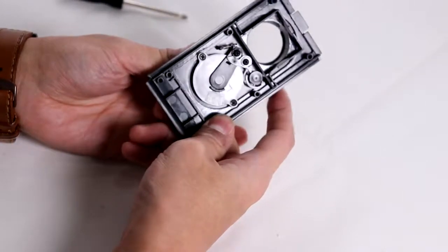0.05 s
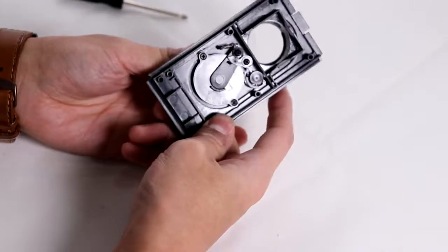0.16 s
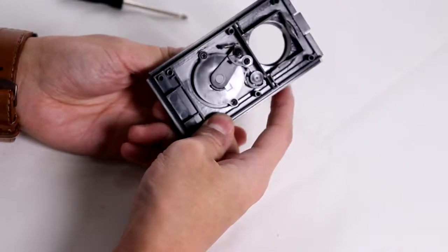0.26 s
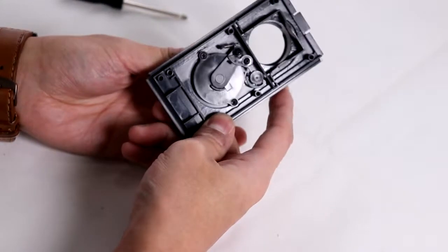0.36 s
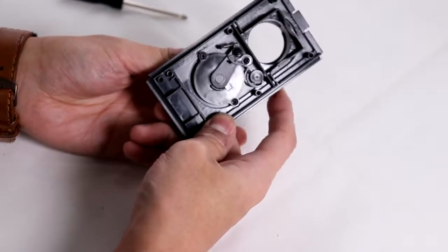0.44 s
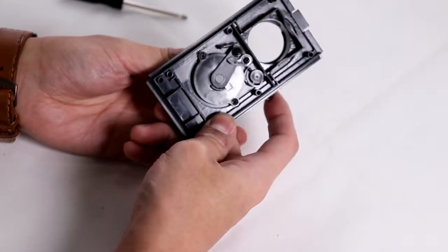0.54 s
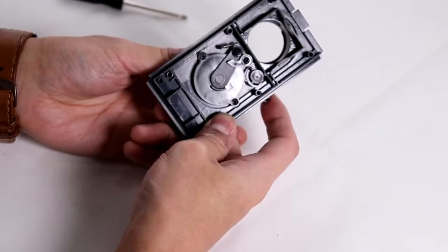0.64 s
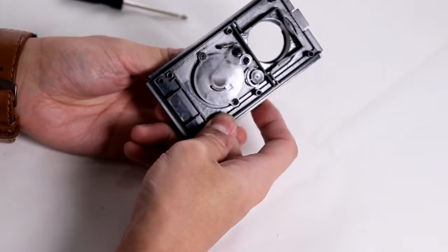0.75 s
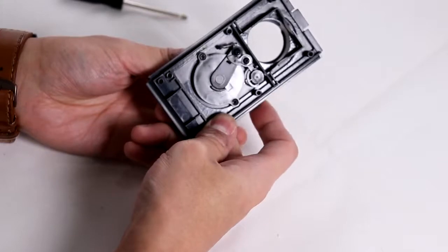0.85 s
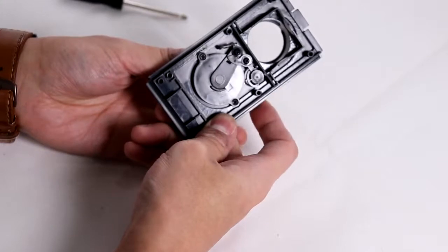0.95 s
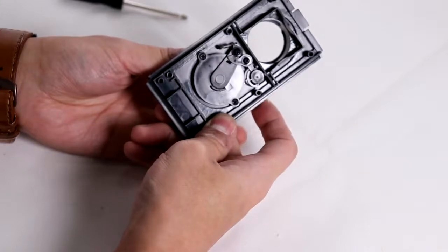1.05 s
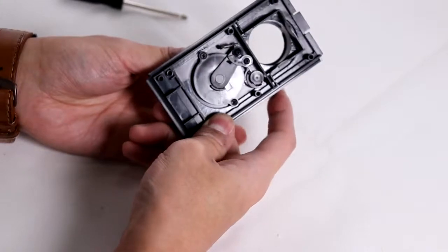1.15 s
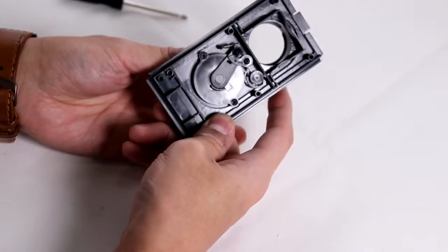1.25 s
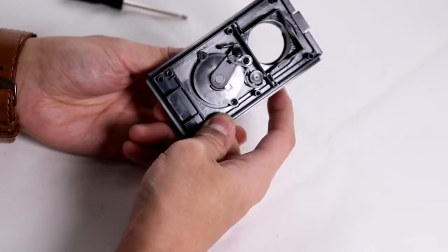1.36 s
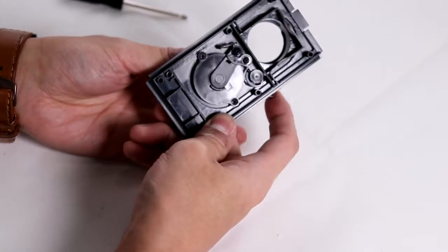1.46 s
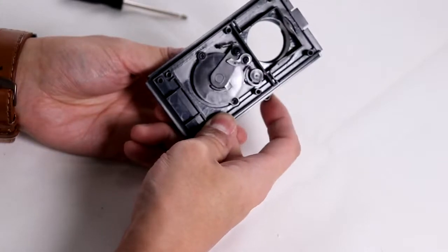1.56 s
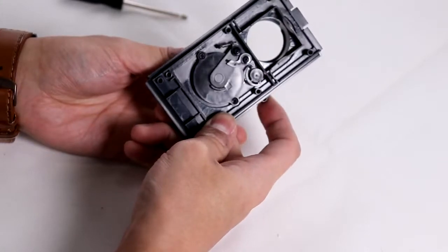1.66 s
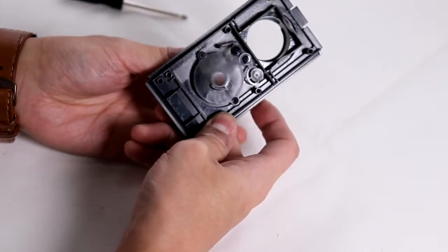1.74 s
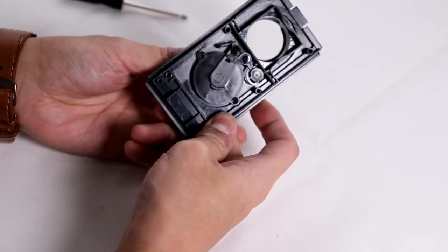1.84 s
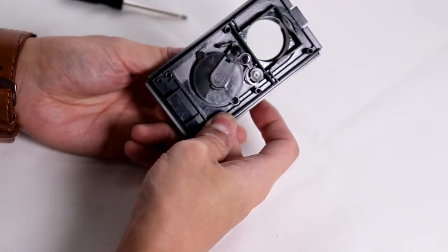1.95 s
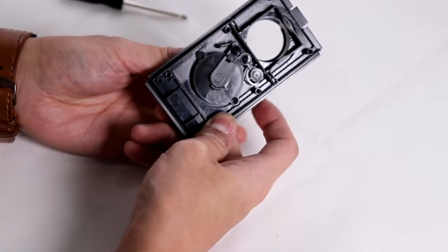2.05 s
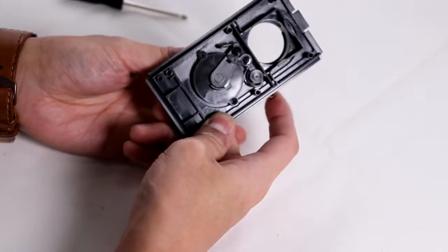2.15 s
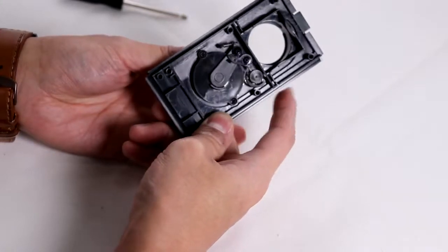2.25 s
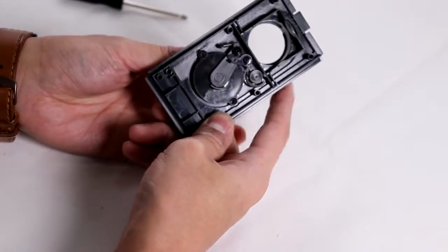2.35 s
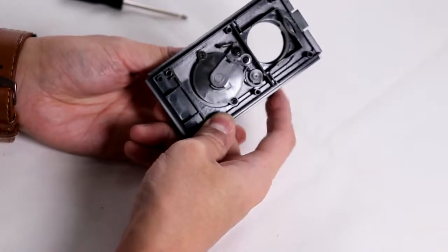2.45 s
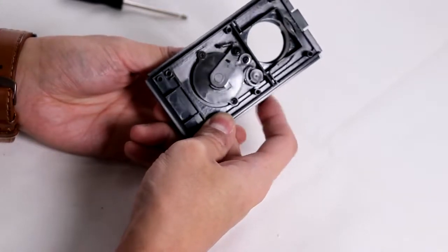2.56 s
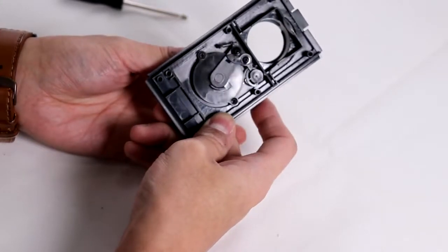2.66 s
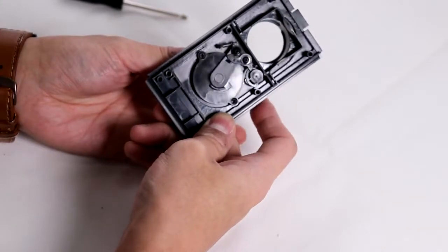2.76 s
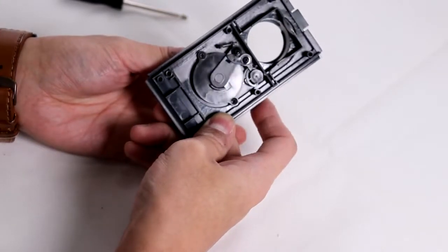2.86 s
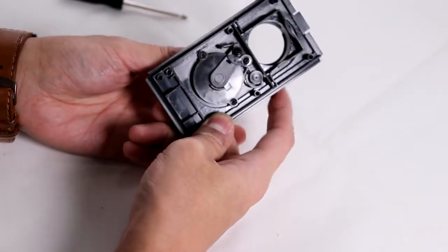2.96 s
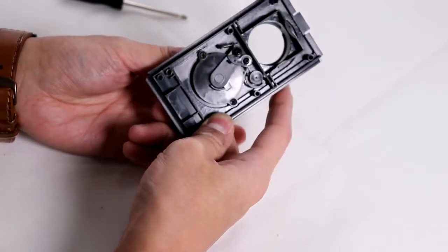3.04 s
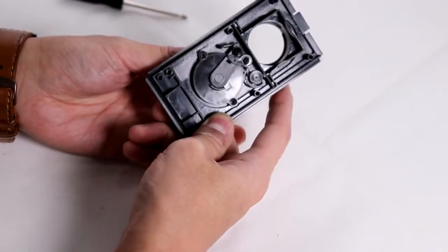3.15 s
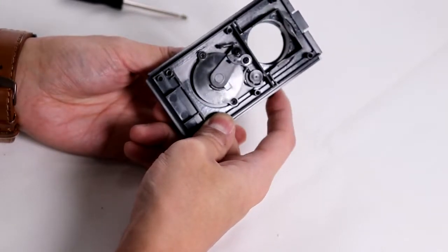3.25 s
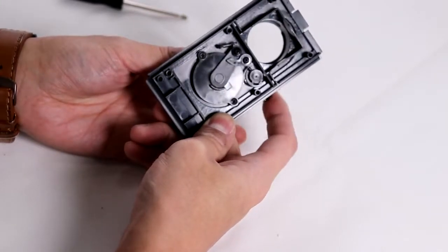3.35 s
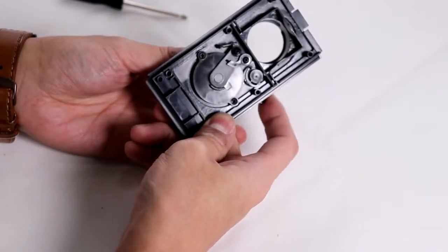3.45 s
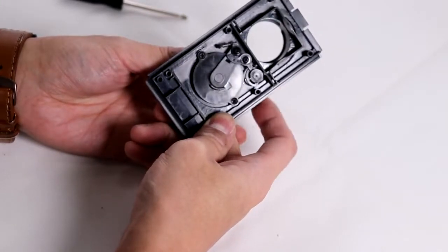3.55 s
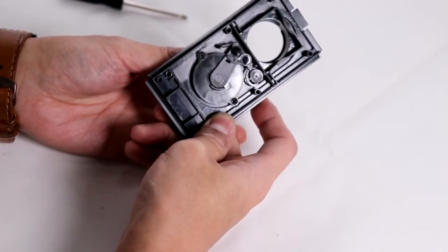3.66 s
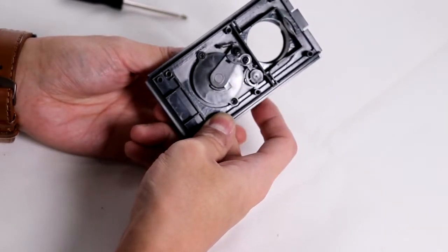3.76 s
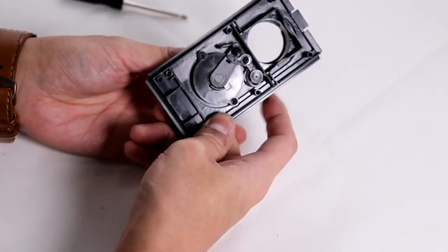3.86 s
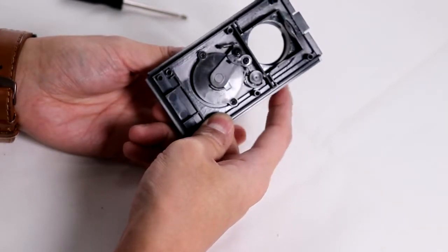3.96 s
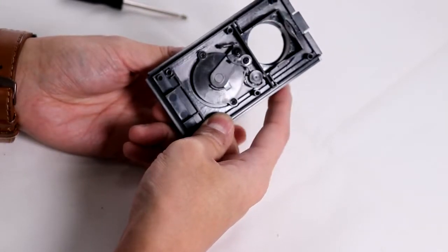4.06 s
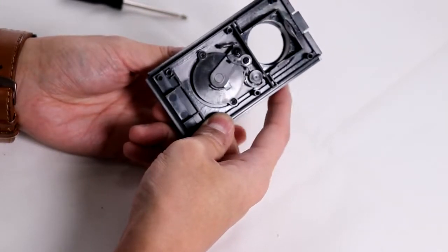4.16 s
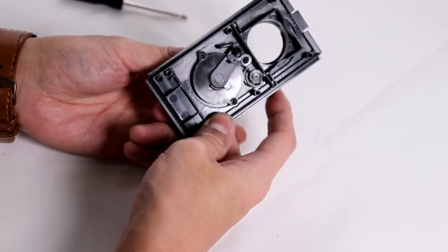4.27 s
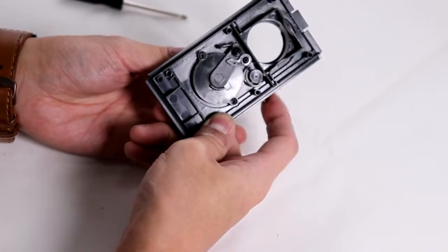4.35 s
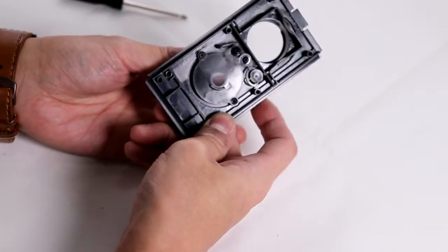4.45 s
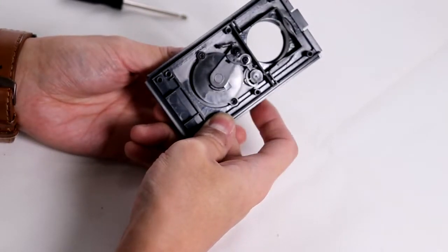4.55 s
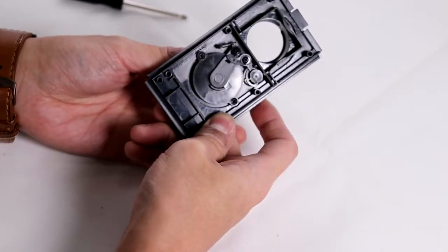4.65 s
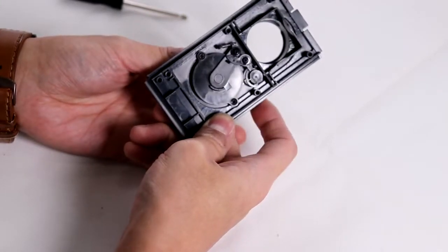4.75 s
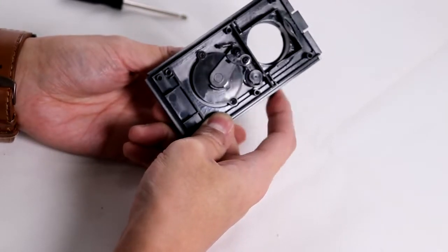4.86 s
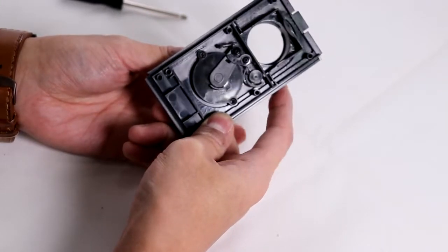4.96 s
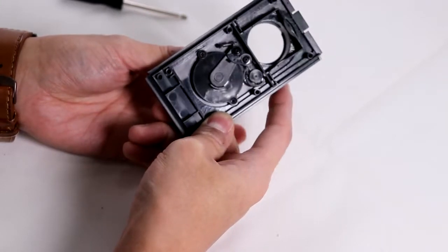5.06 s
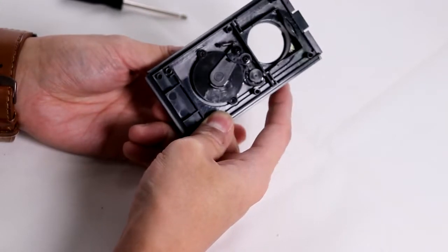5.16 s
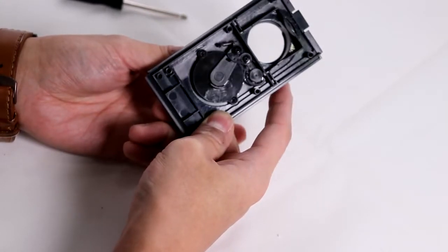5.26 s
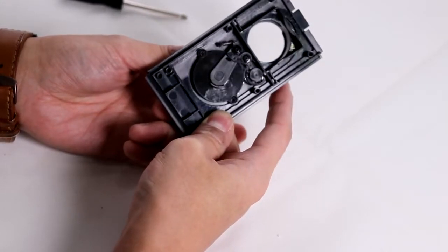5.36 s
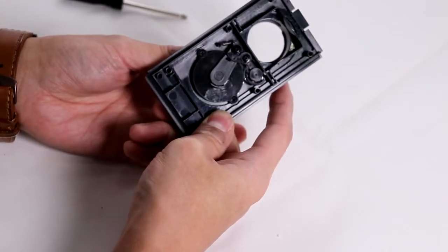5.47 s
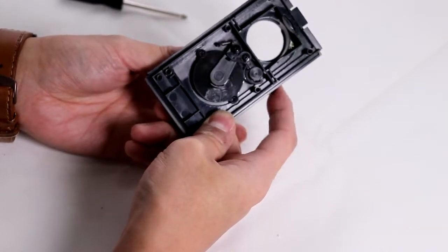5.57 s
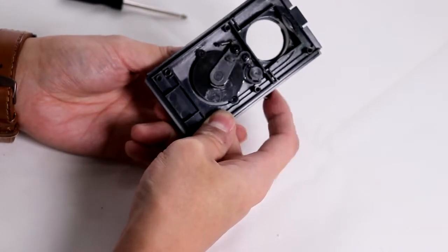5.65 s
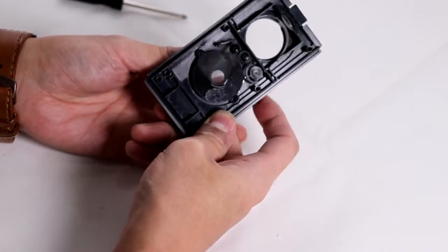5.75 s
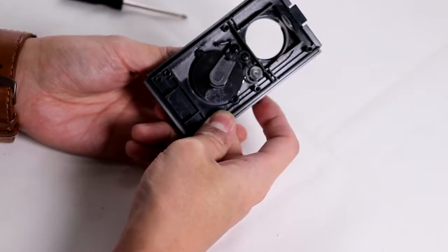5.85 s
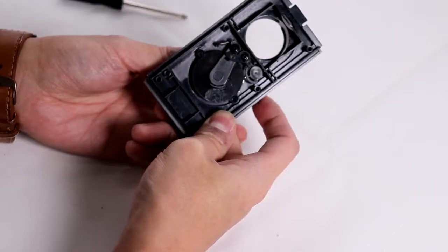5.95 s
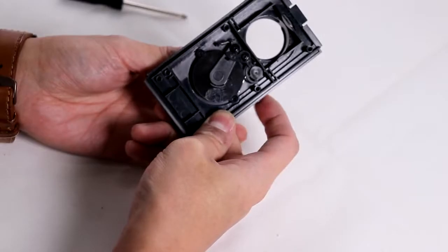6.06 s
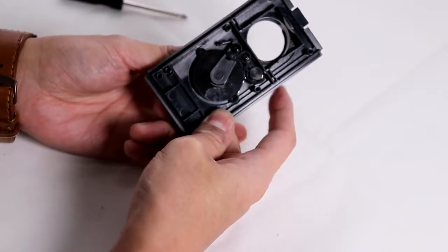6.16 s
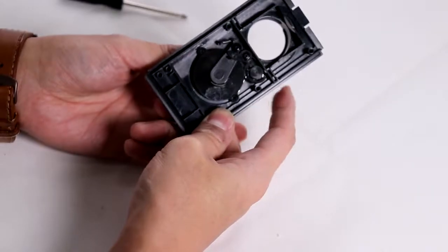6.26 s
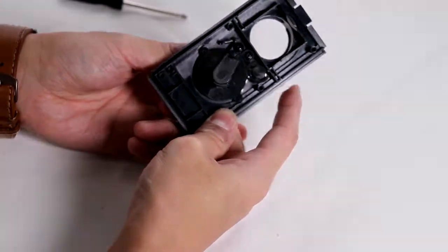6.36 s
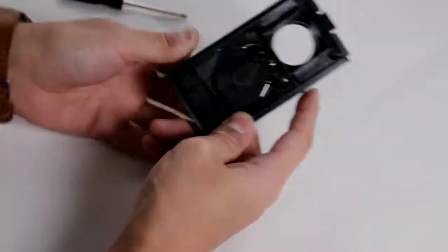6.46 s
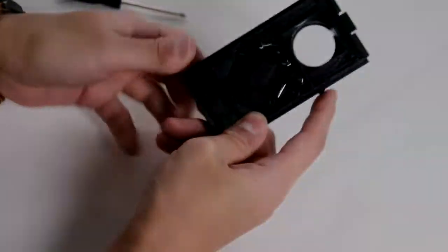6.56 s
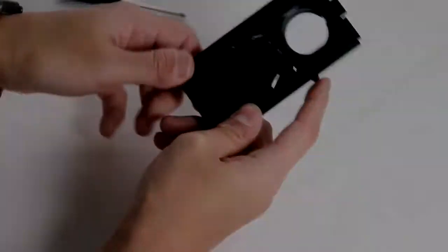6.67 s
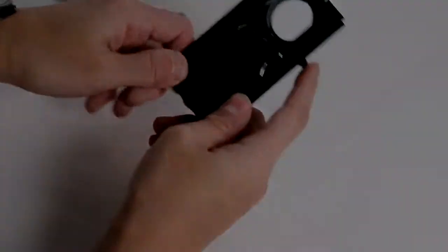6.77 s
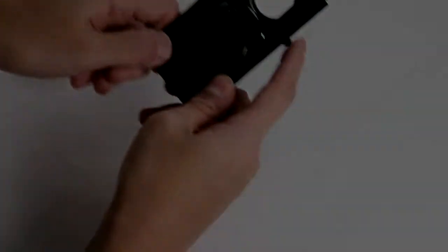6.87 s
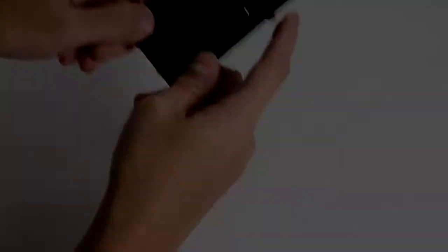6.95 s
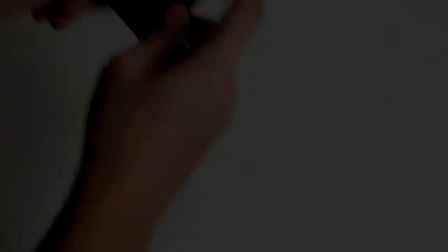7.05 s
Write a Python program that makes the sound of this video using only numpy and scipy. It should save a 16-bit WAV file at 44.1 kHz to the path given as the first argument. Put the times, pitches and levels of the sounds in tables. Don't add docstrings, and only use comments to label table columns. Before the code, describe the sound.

In a quiet room, close to a stereo microphone, a thumb works a small plastic shutter. Each cycle has a faint drag and tick, one crisp reset click with a tiny late bounce, then about half a second later a spring release: latch click, graze, slap and rebound packed into one snappy clatter. Seven resets alternate with the releases over low air hum; brief finger rustling and a light knock end it.

```python
import sys
import numpy as np
from scipy import signal
from scipy.fft import rfft, irfft
from scipy.io import wavfile
from scipy.ndimage import uniform_filter1d

SR = 44100
rng = np.random.default_rng(int(sys.argv[2]) if len(sys.argv) > 2 else 0)


def waveform_to_disk(signal):
    frames = np.transpose(np.atleast_2d(signal))
    scaled = np.clip(frames, -1, 1) * 32767
    samples = np.round(scaled).astype(np.int16)
    wavfile.write(sys.argv[1], SR, samples)


def gain_from_decibels(decibels):
    exponent = np.asarray(decibels, float) / 20
    return 10 ** exponent


N = 313551
LEAD = SR // 4


def rms_one(x):
    return x / np.sqrt(np.mean(x ** 2) + 1e-20)


def at_hz(points, hz, column=1):
    points = np.array(points)
    return np.interp(np.log(hz), np.log(points[:, 0]), points[:, column])


def ring(clicks, hz, t60):
    radius = gain_from_decibels(-60 / (max(t60, .0004) * SR))
    angle = 2 * np.pi * hz / SR
    feedback = [1, -2 * radius * np.cos(angle), radius * radius]
    return signal.lfilter([0, np.sin(angle)], feedback, clicks + 1e-18)


def causal(spectrum, size):
    hz = np.maximum(np.fft.rfftfreq(size, 1 / SR), 1)
    cepstrum = irfft(np.log(gain_from_decibels(at_hz(spectrum, hz))), size)
    cepstrum[1:size // 2] *= 2
    cepstrum[size // 2 + 1:] = 0
    return np.exp(rfft(cepstrum))


# (frequency [Hz], left-right likeness [0-1])
COHERENCE = [(60, .995), (130, 1), (290, 0.92), (640, .6), (1410, 0.38), (3100, 0.091), (15000, 0.083)]


def coloured(spectrum):
    hz = np.maximum(np.fft.rfftfreq(N, 1 / SR), 1)
    mid, side = rfft(rng.standard_normal((2, N))) * gain_from_decibels(at_hz(spectrum, hz))
    alike = np.clip(at_hz(COHERENCE, hz), 0, 1)
    left_right = np.sqrt(1 + alike) * mid + np.sqrt(1 - alike) * side * [[1], [-1]]
    return rms_one(irfft(left_right, N))


# (frequency [Hz], density [dB per Hz])
AIR_SPECTRUM = [(20, -16.5), (31, -15.5), (50, -7), (90, -1), (160, 2), (250, -2.5), (310, -6.5),
                (480, -10), (560, -16.5), (1000, -20.5), (2400, -25), (5000, -30.5), (10000, -35.5),
                (13000, -40), (16000, -41)]
# (frequency [Hz], width [Hz], rms level [dB])
ROOM_MODES = [(66.5, 7, -44), (119.1, 8.5, -42.5), (172.7, 4.4, -59), (239.1, 8, -53), (468.6, 17, -62)]


def air():
    out = gain_from_decibels(-43.5) * coloured(AIR_SPECTRUM)
    for hz, width_hz, db in ROOM_MODES:
        noise = rng.standard_normal(size=(3, N + SR))
        drive = noise[0] + hz / 2000 * noise[1:]
        t60 = np.log(1000) / (np.pi * width_hz)
        mode = ring(ring(drive, hz, t60), hz, t60 / 2)
        out += gain_from_decibels(db) * rms_one(mode[:, SR:])
    return out


# (frequency [Hz], t60 [s], level [dB])
REVERBERATION = [(700, .35, -46.5), (1260, 0.48, -40.5), (2360, 0.52, -37.5), (4030, 0.43, -42),
                 (6000, .38, -39.5), (10000, 0.35, -37), (15000, .3, -40.5)]


def room(x):
    t = np.arange(SR // 2) / SR
    tail = 0
    white = rng.standard_normal((2, 2, len(t)))
    edges = 350 * 2 ** np.arange(0, 6, .5)
    for k, (low, high) in enumerate(zip(edges, edges[1:])):
        half_octave = signal.butter(2, [low, high], "band", fs=SR, output="sos")
        band = signal.sosfilt(half_octave, white[k % 2])
        hz = np.sqrt(low * high)
        decay_db = -60 * t / at_hz(REVERBERATION, hz)
        tail = tail + band * gain_from_decibels(at_hz(REVERBERATION, hz, column=2) + decay_db)
    tail = tail * (1 - np.exp(-t / 0.0027))
    tail = tail + 0.1 * tail[::-1]
    return signal.fftconvolve(x.mean(0, keepdims=True), tail, axes=1)[:, :x.shape[1]]


# (time [s], level [dB])
FINGER_MOTION = [
    (6.45, -62),
    (6.508, -57),
    (6.622, -47.5),
    (6.666, -53.5),
    (6.688, -48.5),
    (6.786, -46),
    (6.844, -58.5),
    (7.03, -64),
    (7.11, -51),
]
# (frequency [Hz], density [dB per Hz])
SKIN_FRICTION = [(290, -42), (500, -8), (640, 2.5), (708, -21), (831, -4), (7980, -13.5), (14500, -25),
                 (16000, -37)]


def rustle():
    s, db = np.transpose(FINGER_MOTION)
    motion_db = np.interp(np.arange(N) / SR, s, db + 1.0, left=-120, right=-120)
    grain = gain_from_decibels(1.5 * rms_one(uniform_filter1d(rng.standard_normal(N), size=300)))
    return gain_from_decibels(motion_db) * grain * coloured(SKIN_FRICTION)


# (time [s], peak level [dB], pitch [Hz])
STRAY_CREAKS = [(0.1934, -35, 2500), (0.8654, -44.5, 2960), (1.8215, -39.5, 2660), (1.8391, -39, 1980),
                (2.6405, -37.5, 8260), (2.6919, -40.5, 7500), (2.7242, -38, 2970), (2.745, -46.5, 2900),
                (3.4251, -42, 7500), (3.6459, -39.5, 2130), (4.588, -45, 2440), (5.7493, -41, 7500),
                (.765, -44.5, 7500), (1.645, -45.5, 7500), (5.879, -40.5, 2910), (5.9055, -32, 2900),
                (6.5622, -40.5, 2050), (6.6844, -47, 2230), (6.8044, -42, 2270)]
# (drag time [s], drag level [dB], tick lead [s], tick level [dB])
CAM_STROKES = [
    (0.186, -52, .025, -48),
    (1.297, -49, .0255, -36),
    (2.2918, -50, .0264, -36.5),
    (3.121, -49, .0192, -35),
    (4.0677, -51.5, .03, -40),
    (5.028, -49.5, .024, -31.5),
    (6.3096, -48.5, .0265, -37),
]


def creaks():
    out = np.zeros((2, LEAD + N))
    t = np.arange(SR // 20) / SR
    pawl_ticks = [(s - lead_s, db, 7000) for s, _, lead_s, db in CAM_STROKES]
    cam_catches = [(s, db + 14.5, 2850) for s, db, *_ in CAM_STROKES]
    for s, db, hz in pawl_ticks + cam_catches + STRAY_CREAKS:
        dying = gain_from_decibels(-60 * t / (.012 + 110 / hz)) * np.clip(t / .001, 0, 1)
        scratch = rng.standard_normal(size=(3, len(t))) * dying
        scratch = scratch[0] + 1.6 * scratch[1:]
        sound = ring(scratch, hz, .002) + .9 * ring(scratch, 6000, .0005)
        at = LEAD + round(s * SR)
        out[:, at:at + len(t)] += gain_from_decibels(db + 1.0) * sound / np.abs(sound).max()
    return out


def rubbing(strokes, colour):
    t = np.arange(N) / SR
    strength = sum(gain_from_decibels(db) * np.clip(np.minimum(t - start, end - t) / .003, 0, 1)
                   for start, end, db in strokes)
    return strength * coloured(colour)


REBOUND_LAG_S = .0099
# (frequency [Hz], density [dB per Hz])
BLADE_FRICTION = [(600, -28.5), (1200, -6), (2500, 0.5), (4000, 0.5), (7000, -4), (10000, -11.5),
                  (16000, -16.5)]
# (frequency [Hz], density [dB per Hz])
CAM_FRICTION = [(1200, -44), (2200, -1), (2900, 3), (3600, 1.5), (5000, -5), (9000, -36), (15000, -39.5)]


def sliding_parts():
    sweeps = [(s, s + travel_s + REBOUND_LAG_S, -33) for s, travel_s, *_ in RELEASE_TIMES]
    drags = [(s, s + .021, db) for s, db, *_ in CAM_STROKES]
    return rubbing(sweeps, BLADE_FRICTION) + rubbing(drags, CAM_FRICTION)


def spread(spectrum, modes):
    click = irfft(causal(spectrum, size=2048), 2048)
    tick = np.arange(len(click)) == 0
    rings = sum(gain_from_decibels(db) * ring(tick, hz, t60) for hz, db, t60 in modes)
    return rms_one(click / np.abs(click).max() + rings)


def contact(times, levels_db, colour, modes, all_round, swell_s, chatter_s, chatter_db, pan_db):
    size = 2048
    t = np.arange(size) / SR
    habit = rng.standard_normal(size=(3, size))
    apart = np.clip(t / 0.0036, 0, 1)
    dying = gain_from_decibels(-60 * t / chatter_s) + gain_from_decibels(-11.5 - 60 * t / 0.037)
    dying *= np.clip(t / swell_s, .15, 1)
    pan = np.array([[pan_db / 2], [-pan_db / 2]])
    out = np.zeros((3, LEAD + N + size))
    for s, db in zip(times, levels_db):
        shared, *sides = habit + 0.52 * rng.standard_normal((3, size))
        chatter = np.sqrt(1 - apart) * shared + np.sqrt(apart) * np.array(sides)
        blow = chatter * gain_from_decibels(chatter_db) * dying
        blow[:, round(swell_s * SR)] = 1
        blow_spectrum = rfft(blow)
        smooth_power = uniform_filter1d(np.abs(blow_spectrum) ** 2, size=31)
        even = blow_spectrum / np.sqrt(smooth_power)
        crack = irfft(even * causal(colour, size), size) * (t < .035)
        sound = crack / np.abs(crack).max()
        push = np.diff(blow, prepend=0)
        for hz, mode_db, t60 in modes:
            sound = sound + gain_from_decibels(mode_db) * ring(push, hz, t60) * SR / (20 * hz)
        at = LEAD + round(s * SR)
        out[:2, at:at + size] += gain_from_decibels(db + pan) * sound
        out[2, at:at + size] += gain_from_decibels(db) * np.std(sound) * all_round
    return out[:, :LEAD + N]


def knock():
    return contact([7.007], [-29.5], BLADE_FRICTION, [], spread(RESET_POWER, []),
                   swell_s=.0005, chatter_s=0.022, chatter_db=-0.5, pan_db=1.6)


# (time [s], level [dB], bounce lag [s], bounce level [dB])
RESET_TIMES = [
    (0.2418, -0.5, .0409, -26),
    (1.3475, 0, .0567, -24),
    (2.3585, 0.5, .0256, -11),
    (3.1555, -1.5, .035, -35),
    (4.1086, -1, .032, -37),
    (5.0744, 0, .036, -34),
    (6.3487, -1.5, .0155, -13),
]
# (frequency [Hz], density [dB per Hz])
RESET_CRACK = [(530, -61), (900, -34), (1320, -23.5), (1750, -5), (2300, 2), (2630, -3.5), (2960, -12),
               (3430, -4), (4050, -16.5), (4630, -3), (5750, -4), (7140, -12.5), (8660, 0.5), (11100, -7),
               (16000, -16)]
BOUNCE_CRACK = [(410, -52), (700, -29.5), (1890, 7.5), (3320, -9), (6230, 0.5), (8100, -8), (10800, -14),
                (11700, -21), (12600, -9.5), (16000, -29.5)]
# (frequency [Hz], level [dB], t60 [s])
RESET_MODES = [(2585, -27.5, .02), (4970, -25, 0.024), (5800, -23, 0.06)]
# (frequency [Hz], density [dB per Hz])
RESET_POWER = [(1100, -30), (1900, -3), (3100, -10), (4600, 2), (6200, -2.5), (7300, -12.5), (9300, -5.5),
               (15500, -16.5)]


def resets():
    reset_s, reset_db, lag_s, bounce_db = np.transpose(RESET_TIMES)
    bounce_power = spread(BOUNCE_CRACK, [(1250, -9, 0.0071)])
    click = contact(reset_s, reset_db, RESET_CRACK, RESET_MODES, gain_from_decibels(.3) * spread(RESET_POWER, []),
                    swell_s=.0004, chatter_s=.009, chatter_db=-7.5, pan_db=-3.0)
    bounce = contact(reset_s + lag_s, bounce_db, BOUNCE_CRACK, [(1250, -11.5, 0.005)],
                     gain_from_decibels(1.0) * bounce_power,
                     swell_s=0.00095, chatter_s=.04, chatter_db=-4.5, pan_db=0.5)
    return click + bounce


# (latch time [s], blade travel to the slap [s], graze level [dB], push [dB])
RELEASE_TIMES = [
    (-.135, .037, 2, 2.5),
    (0.9118, .0378, -3.5, 1),
    (1.91, 0.036, -2, -0.6),
    (2.7627, 0.039, -3, 0.2),
    (3.6881, .0436, -5, 0.5),
    (4.621, 0.025, -2, 0),
    (5.9166, 0.028, -3, 0.7),
]
# (frequency [Hz], density [dB per Hz])
LATCH_CRACK = [(350, -51.5), (600, -29), (1700, -13), (2340, 3.5), (2870, -3), (5050, -10), (5480, -17),
               (7310, -4), (7940, -11.5), (8860, -2.5), (9760, -19.5), (10700, -7), (11800, -23.5),
               (13600, -14), (16000, -26)]
GRAZE_CRACK = [(350, -58.5), (600, -26), (1590, -19.5), (2310, -3.5), (3780, -9.5), (5260, -7), (5790, 4),
               (7020, -9.5), (8620, -9.5), (9490, -20.5), (12800, -18.5), (14700, -16), (16000, -27)]
SLAP_CRACK = [(290, -55), (500, -34), (1480, -34), (1980, -20), (2810, -8), (3490, -18.5), (5090, -11.5),
              (5800, 3.5), (6420, -4), (6900, -10), (7530, -6), (8090, -14.5), (9770, -18), (14700, -24.5),
              (16000, -31)]
REBOUND_CRACK = [(350, -62), (600, -35.5), (931, -30), (1730, -19), (2760, -11), (3340, -22), (4050, -12),
                 (4780, -4), (5710, -7.5), (6200, -1), (7310, -4.5), (8160, -11), (10700, -20),
                 (11800, -26.5), (16000, -28.5)]
# (frequency [Hz], level [dB], t60 [s])
LATCH_MODES = [(2580, -29.5, .025), (6340, -23.5, .02)]
BLADE_MODES = [(1160, -46, 0.047), (2520, -25, .03), (5670, -28, .02)]
# (frequency [Hz], density [dB per Hz])
RELEASE_POWER = [(600, -40.5), (1450, -23), (2250, -13), (2800, -10), (4200, -9), (5680, -1), (6590, -5.5),
                 (15500, -25)]
# (frequency [Hz], level [dB], t60 [s])
RELEASE_POWER_MODES = [(1160, -22.5, 0.0072), (2270, -17, 0.0091), (5830, -7.5, 0.006)]


def releases():
    latch_s, travel_s, graze_db, push_db = np.transpose(RELEASE_TIMES)
    slap_s = latch_s + travel_s
    all_round = spread(RELEASE_POWER, RELEASE_POWER_MODES)
    latch_db = 1.8 + 0 * push_db
    latch = contact(latch_s, latch_db, LATCH_CRACK, LATCH_MODES, gain_from_decibels(-1.5) * spread(RESET_POWER, []),
                    swell_s=0.00059, chatter_s=0.02, chatter_db=-3, pan_db=0.0)
    graze = contact(slap_s - 0.009, graze_db, GRAZE_CRACK, BLADE_MODES, all_round,
                    swell_s=0.00084, chatter_s=0.0092, chatter_db=-6.5, pan_db=-0.7)
    slap = contact(slap_s, 3.5 + push_db, SLAP_CRACK, BLADE_MODES, all_round,
                   swell_s=.0003, chatter_s=0.017, chatter_db=-5.5, pan_db=-1.5)
    rebound = contact(slap_s + REBOUND_LAG_S, 9 + push_db, REBOUND_CRACK, BLADE_MODES, all_round,
                      swell_s=.0007, chatter_s=.01, chatter_db=-3.5, pan_db=1.7)
    return latch + graze + slap + rebound


def scene():
    *sides, all_round = releases() + resets() + knock()
    small = creaks()
    shutter = sides + small + room(all_round + small)
    return air() + rustle() + sliding_parts() + shutter[:, LEAD:]


def limiter(x, top_db, recovery_db_per_s, attack_s):
    over_db = np.maximum(20 * np.log10(np.abs(x).max(0) + 1e-9) - top_db, 0)
    slope = recovery_db_per_s * np.arange(N) / SR
    cut_db = np.maximum.accumulate(over_db + slope) - slope
    r = np.exp(-1 / (attack_s * SR))
    return x * gain_from_decibels(-signal.lfilter([1 - r], [1, -r], cut_db))


def treble_gap(x):
    gap_s, lead_s, gap_db = 0.0089, 0.0056, -22
    hits = np.flatnonzero(np.abs(x).max(0) > .2)
    sudden = hits[np.diff(hits, prepend=-SR) > .2 * SR] / SR
    t = np.arange(N) / SR + lead_s
    gap = sum(np.clip(np.minimum(t - s + gap_s, s - t) / .0015, 0, 1) for s in sudden)
    treble = signal.sosfiltfilt(signal.butter(2, 2300, "high", fs=SR, output="sos"), x)
    return x - treble * gap * (1 - gain_from_decibels(gap_db))


def low_pass(x):
    return signal.sosfilt(signal.butter(12, 16450, fs=SR, output="sos"), x)


def record(dry):
    heard = signal.sosfilt(signal.cheby1(8, .5, 15800, fs=SR, output="sos"), dry)
    limited = limiter(heard, top_db=-2, recovery_db_per_s=112, attack_s=0.0014)
    mix = treble_gap(np.clip(limited, -1, 1))
    return low_pass(mix)


dry = scene()
out = record(dry)
waveform_to_disk(out)
```